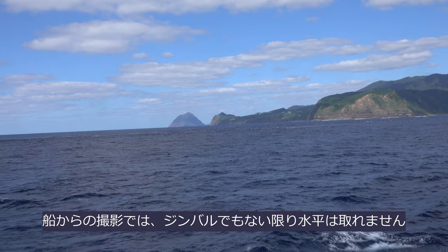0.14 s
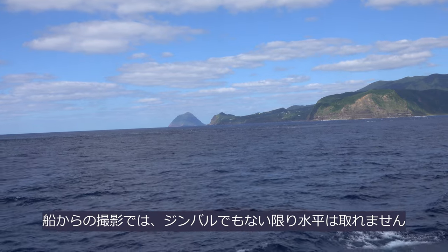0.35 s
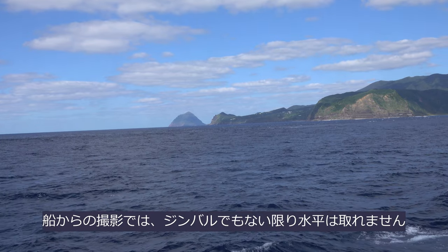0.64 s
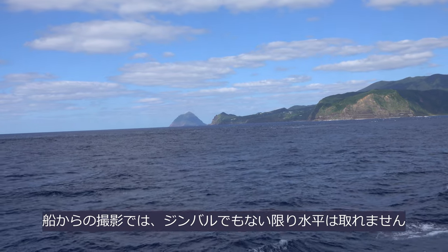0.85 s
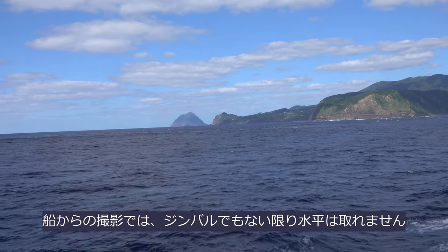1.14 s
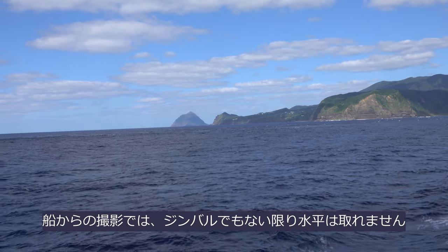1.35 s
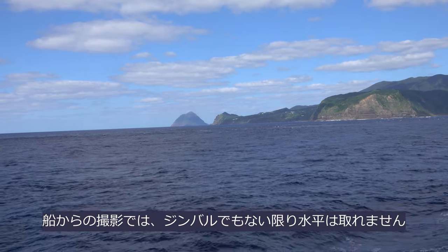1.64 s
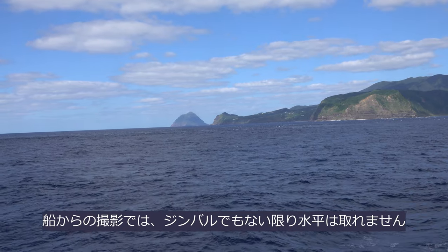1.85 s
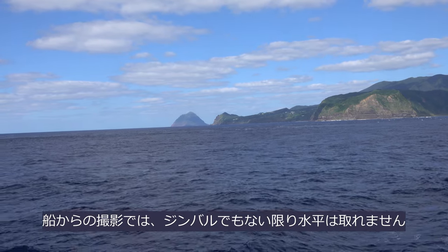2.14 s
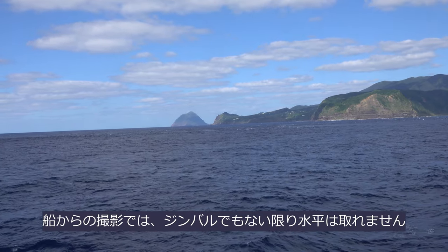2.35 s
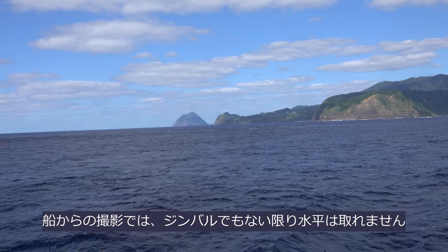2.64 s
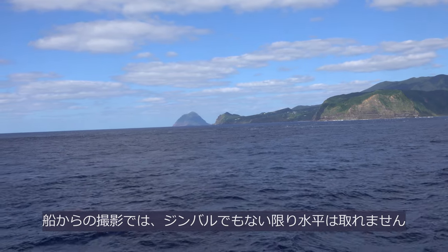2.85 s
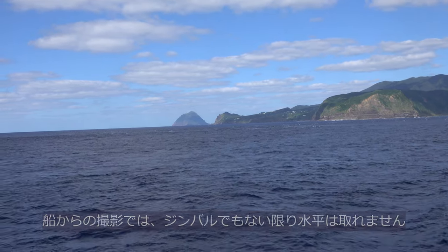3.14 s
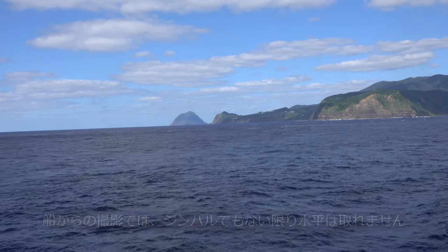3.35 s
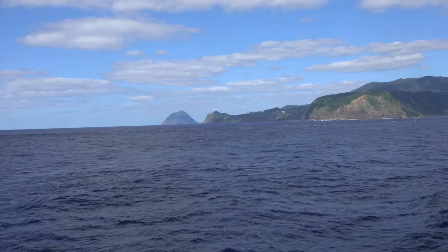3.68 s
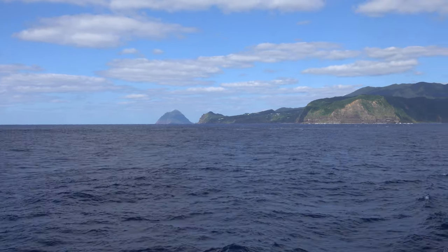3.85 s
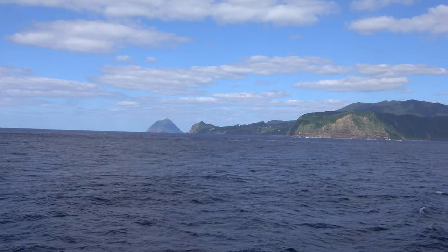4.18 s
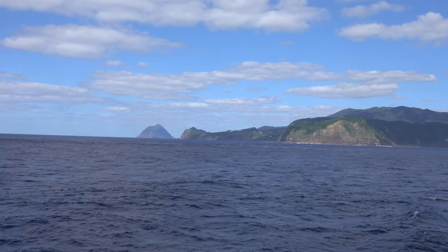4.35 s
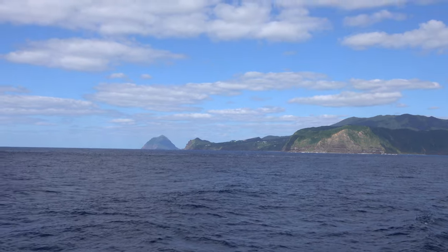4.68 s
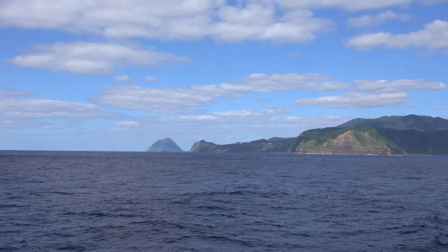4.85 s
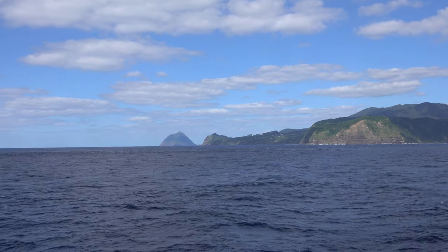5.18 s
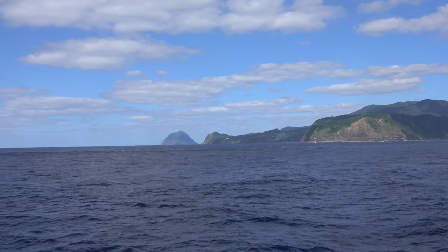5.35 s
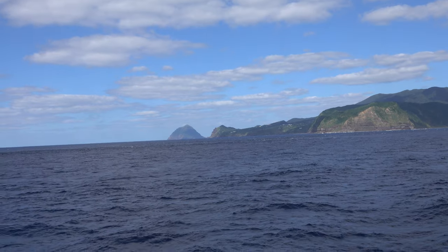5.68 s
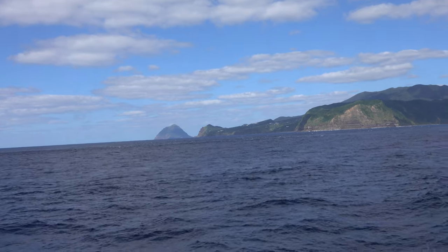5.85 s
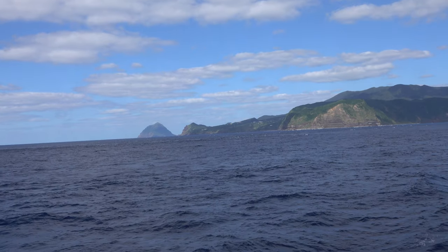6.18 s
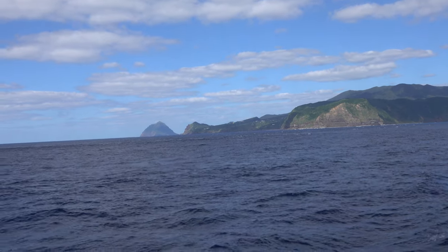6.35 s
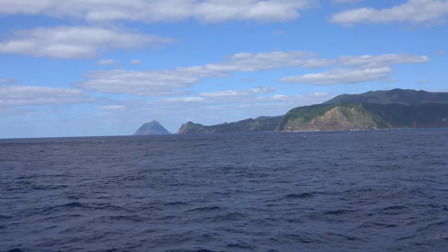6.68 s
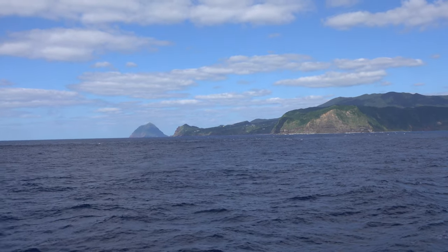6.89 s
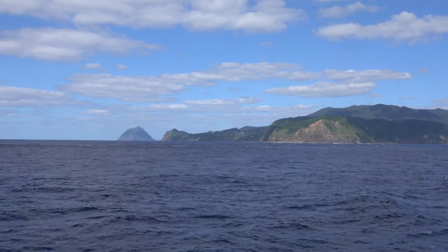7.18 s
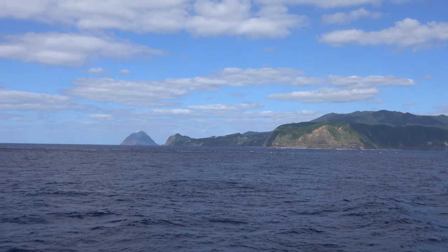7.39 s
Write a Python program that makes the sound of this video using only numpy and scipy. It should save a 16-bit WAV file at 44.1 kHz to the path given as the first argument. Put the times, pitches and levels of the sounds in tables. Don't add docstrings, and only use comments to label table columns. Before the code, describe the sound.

A ferry's big diesel drones low and steady on the open deck, with rumbling exhaust, hissing bow wash and soft wind buffeting.

```python
import sys
import numpy as np
from scipy import signal
from scipy.fft import rfft, irfft, next_fast_len
from scipy.io import wavfile
from scipy.ndimage import uniform_filter1d

SR = 44100
rng = np.random.default_rng(int(sys.argv[2]) if len(sys.argv) > 2 else 0)


def nominal_scale(level):
    x = np.asarray(level, float) / 20
    return 10 ** x


def put_to_file(sound):
    columns = np.atleast_2d(sound).T
    safe = np.clip(columns, -1, 1)
    whole_steps = np.round(safe * 32767)
    wavfile.write(sys.argv[1], SR, whole_steps.astype(np.int16))


N = 331632

# frequency in Hz, level in dB per Hz.
FAR_WATER_SPECTRUM = [(2000, -15), (6000, -1), (10000, -2), (15700, -5), (17000, -8)]
# start in seconds, level in dB.
HULL_SLAM = (6.9, -16.5)
# frequency in Hz, level in dB, 60 dB decay time in seconds.
PLATING_MODES = [
    (36.2, -19, 0.5),
    (100, 3, 0.25),
    (118.5, 0.5, 0.52),
]
# start in seconds, level in dB, pitch in Hz.
WATER_DROPS = [
    (.929, -52, 7000),
    (2.311, -54, 7200),
    (6.513, -48, 7300),
    (7.042, -48, 2330),
]
# frequency in Hz, width in Hz, lift in dB.
DECK_RESONANCES = [(251, 18.6, 4.5), (290.8, 19, 5), (357, 3.4, 8.5), (387, 5.2, 4.5), (437.8, 33.5, 8.5),
                   (465, 12, 3.5), (485, 13, 5), (508.6, 17, 5), (595, 25, 5), (655, 27, 6.5),
                   (822, 18, 5.5), (857, 15, 1.5), (1012, 11, 8)]
# frequency in Hz, level in dB per Hz.
RUMBLE_SPECTRUM = [(200, -30.5), (300, -2), (400, -7), (550, -8), (780, -6.5), (940, -12.5), (1300, -17.5),
                   (2000, -26), (4000, -53)]
# frequency in Hz, level in dB per Hz.
WASH_SPECTRUM = [(500, -58), (1000, 1.5), (1500, -7), (1800, -4), (2020, -10), (2450, -8), (3400, -13.5),
                 (4200, -18.5), (8000, -44)]
# frequency in Hz, level in dB per Hz.
SPRAY_SPECTRUM = [(1500, -23), (3500, -1), (5000, 3), (6700, 1), (7500, -2.5), (8600, -2.5), (9500, -12.5),
                  (14000, -24)]
# crest in seconds, spray in dB over its steady level,
# time to die away in seconds.
BOW_WAVES = [(0.03, 4.5, 0.19), (0.92, 0.5, .04), (1.7, 3, 0.076), (1.95, 1, .2), (2.95, 4, 0.27),
             (3.33, 4, 0.18), (3.87, 4, 0.14), (4.2, 2, 0.33), (4.6, 2.5, 0.24), (5.0, 3, 0.24),
             (6.2, 1.5, 0.37), (6.95, 1, 0.32)]
# time in seconds, level in dB.
WIND_LEVEL = [(0.0, -57), (0.85, -61), (1.5, -53), (2.6, -50), (3.3, -49), (3.8, -54), (5.6, -53),
              (6.0, -51), (6.8, -50), (7.04, -44), (7.52, -54)]
# frequency in Hz, level in dB per Hz.
BUFFET_SPECTRUM = [(3, -34), (8, 5), (30, 5), (44, 2), (56, -7), (120, -16), (300, -25)]
# multiple of its cycle rate, level in dB.
GENERATOR_ORDERS = [(12, -37.5), (20, -38), (24, -48.5), (44, -55), (62, -52), (72, -80)]
# frequency in Hz, level in dB.
AUXILIARY_TONES = [
    (33.28, -55),
    (13937, -89),
]
# frequency in Hz, level in dB per Hz.
BOOM_SPECTRUM = [(45, -40), (58, -15), (68, -7.5), (85, -6.5), (100, 4), (125, 6), (150, -5.5), (190, -16),
                 (260, -30)]
# frequency in Hz, level in dB per Hz.
BODY_SPECTRUM = [(90, -33), (130, -5), (160, 2), (200, 0.5), (260, -4.5), (330, -15), (450, -20.5)]
# peak in seconds, level in dB against the steady
BOOM_BUMPS = [(0.2, 9), (0.5, 12), (1.3, -4), (1.8, 9), (2.05, 10), (2.9, 9), (3.1, 3), (3.8, 8),
              (4.15, 0), (4.45, 2), (5.1, -1), (5.52, 4), (5.85, -8), (6.15, -2), (6.92, -12), (7.05, -6)]
# time in seconds, four-stroke cycles a second.
ENGINE_SPEED = [(0.0, 5.875), (0.5, 5.878), (1.2, 5.853), (2.0, 5.836), (2.8, 5.801), (3.55, 5.778),
                (4.4, 5.827), (5.1, 5.853), (5.6, 5.849), (6.4, 5.83), (7.52, 5.821)]
# share of the cycle, strength in dB.
CYLINDER_PULSES = [(0.0627, -2.1), (0.1558, 4.2), (0.2246, 5.7), (0.3589, -3.1), (0.394, 4.3),
                   (0.4814, -4.6), (0.5594, -1.9), (0.6231, 6.4), (0.7612, 7.6), (0.7931, 3.1),
                   (0.9034, 5.6), (0.9447, 1.5)]
# multiple of the cycle rate,
# level in dB.
ENGINE_ORDERS = [(6, -53.0), (7, -53.5), (11, -52.8), (12, -44.1), (13, -55.4), (14, -43.2), (15, -51.1),
                 (16, -55.2), (17, -31.2), (18, -32.3), (19, -34.0), (20, -43.0), (21, -38.5), (22, -35.3),
                 (23, -34.4), (24, -40.1), (25, -40.5), (26, -48.9), (27, -46.5), (28, -45.7), (29, -37.6),
                 (30, -56.8),
                 (32, -52.8), (33, -53.1), (34, -50.1), (36, -54.5), (37, -54.5), (38, -42.3), (39, -47.6),
                (40, -52.6), (42, -48.6), (44, -49.7), (45, -51.7), (46, -46.9), (47, -55.3), (50, -59.2),
                (51, -46.5), (52, -55.6), (53, -56.5), (55, -55.1), (57, -54.4), (61, -55.1), (60, -60.6),
                (67, -62.5), (72, -60.0),
                 (66, -61.5), (74, -59.5), (112, -61)]
# multiple of the cycle rate,
# slope in dB per cycle a second, swell depth in dB, swell period in seconds, a swell peak in seconds.
ORDER_SWELLS = [
    (17, 2, 2.4, 5.25, 3.85),
    (18, 28, 3.1, 2.45, 1.3),
    (22, -117, 1.6, 6.25, 5.95),
    (24, -91, 2.0, 2.75, 1.3),
]


def unit(x):
    return x / np.sqrt(np.mean(x ** 2) + 1e-20)


def along(points, hz):
    point_hz, value = np.transpose(points)
    return np.interp(np.log(hz + 1), np.log(point_hz + 1), value, left=-120, right=-120)


def curve(rows):
    s, value = np.transpose(rows)
    return np.interp(np.arange(N) / SR, s, value)


def wobble(rate):
    knots = rng.standard_normal(200)
    return np.interp(np.arange(N) * rate / SR, np.arange(len(knots)), knots)


def surges(rows):
    t = np.arange(N) / SR
    total_db = np.zeros(N)
    for peak, db, rise, fall in rows:
        distance = np.where(t < peak, ((peak - t) / rise) ** 2, (t - peak) / fall)
        total_db += db * np.exp(-distance)
    return total_db


def rush(spectrum, patchy_db, modes=()):
    z = signal.stft(rng.standard_normal(N + 512), nperseg=512)[2]
    patches = uniform_filter1d(rng.standard_normal(z.shape), size=6, axis=0)
    patches = uniform_filter1d(patches, size=12, axis=1)
    noise = signal.istft(z * nominal_scale(patchy_db * unit(patches)), nperseg=512)[1][:N]
    m = next_fast_len(N + 8192)
    hz = np.fft.rfftfreq(m, 1 / SR)
    level_db = along(spectrum, hz)
    for centre_hz, width_hz, db in modes:
        level_db = level_db + db / (1 + (2 * (hz - centre_hz) / width_hz) ** 2)
    return unit(irfft(rfft(noise, m) * nominal_scale(level_db), m)[:N])


def far_water():
    return nominal_scale(-61.5) * rush(FAR_WATER_SPECTRUM, patchy_db=0.5)


def ring(s, modes, attack):
    t = np.clip(np.arange(N) / SR - s, 0, None)
    tones = sum(nominal_scale(db - 60 * t / t60) * np.sin(2 * np.pi * hz * t) for hz, db, t60 in modes)
    return tones * (1 - np.exp(-t / attack))


def hull_slam():
    s, db = HULL_SLAM
    return nominal_scale(db) * ring(s, PLATING_MODES, attack=0.0066)


def water_drops():
    drops = np.zeros(N)
    for s, db, hz in WATER_DROPS:
        modes = [(hz, db + 6, 0.006), (1.25 * hz, db + 2.5, 0.004)]
        drops += ring(s, modes, attack=0.0003)
    return drops


def foam(count, centre_hz, cycles):
    draw = rng.random((count, 3))
    start = (draw[:, 0] * N).astype(int)
    hz = centre_hz * np.exp(1.32 * (draw[:, 1] - 0.5))
    size = nominal_scale(-2.6 * np.log(draw[:, 2] + 0.004))
    step = np.arange(120)
    turns = hz[:, None] * step / SR
    tone = np.sin(2 * np.pi * turns * (1 + 0.036 * turns))
    grain = size[:, None] * np.exp(-turns / cycles) * tone
    return unit(np.bincount((start[:, None] + step).ravel(), grain.ravel())[:N])


def hull_rumble():
    level_db = -37.5 + 0.5 * wobble(8.9)
    return nominal_scale(level_db) * rush(RUMBLE_SPECTRUM, patchy_db=0.27, modes=DECK_RESONANCES)


def bow_wash():
    waves_db = surges([(s, db, 0.89 * fall, fall) for s, db, fall in BOW_WAVES])
    surge = wobble(7)
    wash = rush(WASH_SPECTRUM, patchy_db=0.26) + nominal_scale(-17.5) * foam(count=9000, centre_hz=2210, cycles=3.2)
    spray = rush(SPRAY_SPECTRUM, patchy_db=0.9) + nominal_scale(-10) * foam(count=12000, centre_hz=5500, cycles=2.0)
    wash_db = -50 + 0.75 * waves_db + 0.11 * surge
    spray_db = -63.5 + waves_db + 0.35 * surge
    return nominal_scale(wash_db) * wash + nominal_scale(spray_db) * spray


def wind():
    return nominal_scale(curve(WIND_LEVEL) + 5.5) * rush(BUFFET_SPECTRUM, patchy_db=0.5)


def generator():
    cycle_hz = 7.4662
    t = np.arange(N) / SR
    lines = [(k * cycle_hz, db) for k, db in GENERATOR_ORDERS] + AUXILIARY_TONES
    start_phase = 2 * np.pi * rng.random(len(lines))
    hum = np.zeros(N)
    for (hz, db), phase in zip(lines, start_phase):
        hum += nominal_scale(db + 2.6 * wobble(2.03)) * np.cos(2 * np.pi * hz * t + phase)
    return np.sqrt(2) * hum


def exhaust(drone):
    bumps_db = surges([(s, db, 0.055, 0.09) for s, db in BOOM_BUMPS])
    puffs = unit(np.abs(signal.hilbert(drone, next_fast_len(N))[:N]))
    boom = unit((1.3 + puffs) * rush(BOOM_SPECTRUM, patchy_db=0.9))
    body = unit((3.3 + puffs) * rush(BODY_SPECTRUM, patchy_db=1.0, modes=DECK_RESONANCES))
    return nominal_scale(-33.5 + bumps_db) * boom + nominal_scale(-31.96 + 0.21 * bumps_db) * body


def main_engine():
    cruise = 5.83
    t = np.arange(N) / SR
    speed = curve(ENGINE_SPEED)
    cycle = 2 * np.pi * np.cumsum(speed) / SR
    share, strength_db = np.transpose(CYLINDER_PULSES)
    swell_db = {}
    for k, slope, depth_db, period, peak in ORDER_SWELLS:
        sway = np.cos(2 * np.pi * (t - peak) / period)
        swell_db[k] = slope * (speed - cruise) + depth_db * sway
    drone = np.zeros(N)
    for k, db in ENGINE_ORDERS:
        pattern = np.angle(np.sum(nominal_scale(strength_db) * np.exp(-2j * np.pi * k * share)))
        drift = wobble(1.195)
        level_db = db + 0.7 * swell_db.get(k, drift)
        drone += nominal_scale(level_db) * np.cos(k * cycle + pattern + 0.08 * drift)
    flutter_db = 1.6 * wobble(24)
    return np.sqrt(2) * nominal_scale(flutter_db + 0.07) * drone


def scene():
    drone = main_engine()
    background = far_water() + hull_slam() + water_drops() + hull_rumble() + bow_wash() + wind()
    return (background + generator() + exhaust(drone) + drone)[None]


def top_cut(x):
    return signal.sosfilt(signal.butter(12, 15710, fs=SR, output="sos"), x)


def record(dry):
    top, hardness = 0.275, 6
    rounded = dry / (1 + np.abs(dry / top) ** hardness) ** (1 / hardness)
    return top_cut(rounded)


dry = scene()
out = record(dry)
put_to_file(out)
```